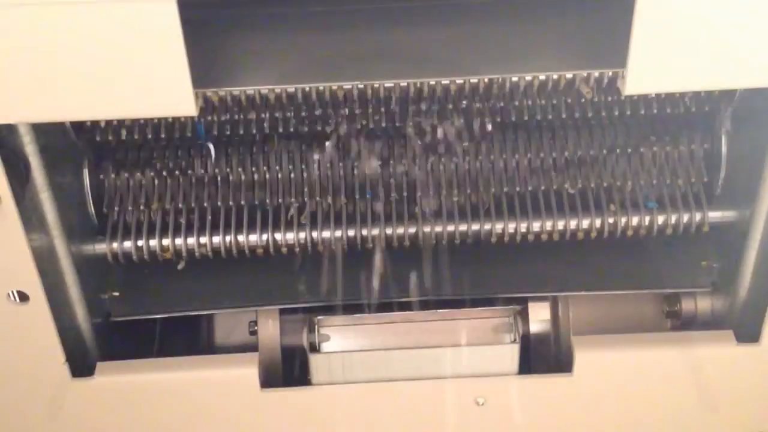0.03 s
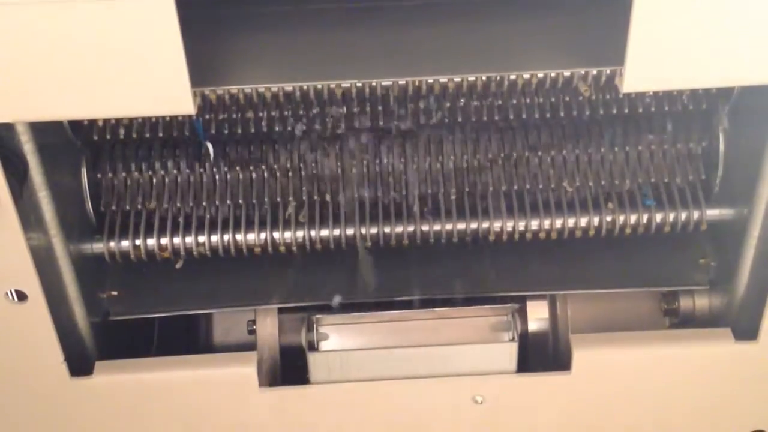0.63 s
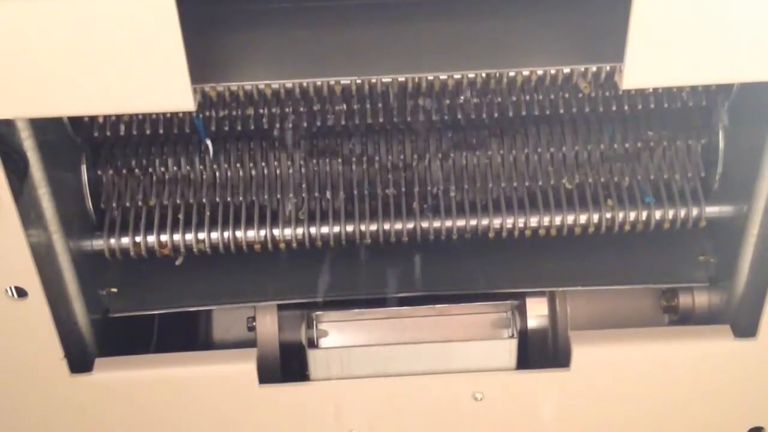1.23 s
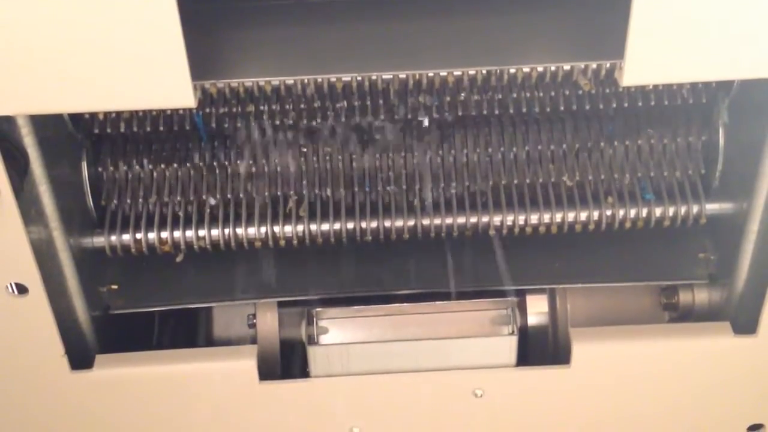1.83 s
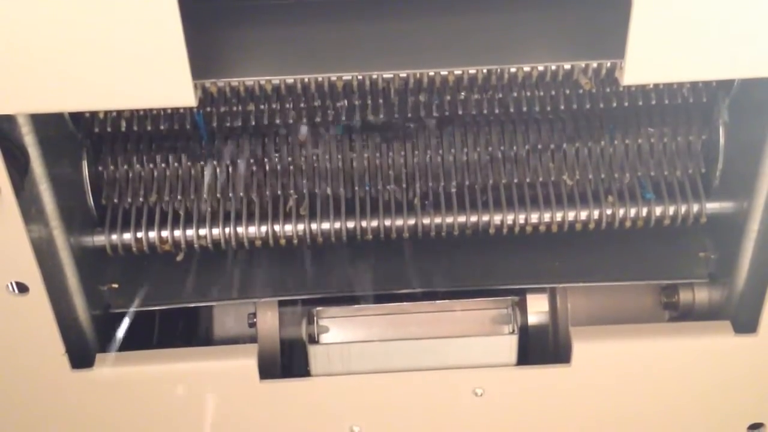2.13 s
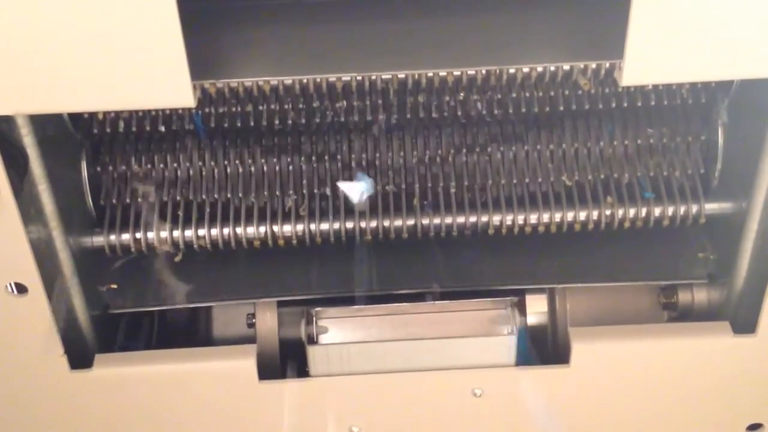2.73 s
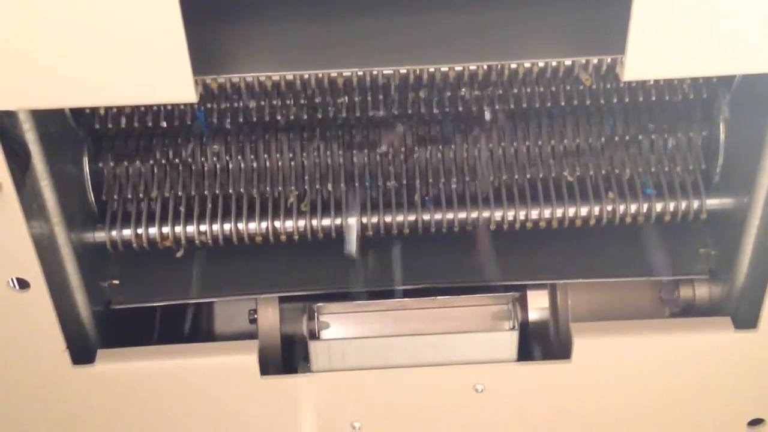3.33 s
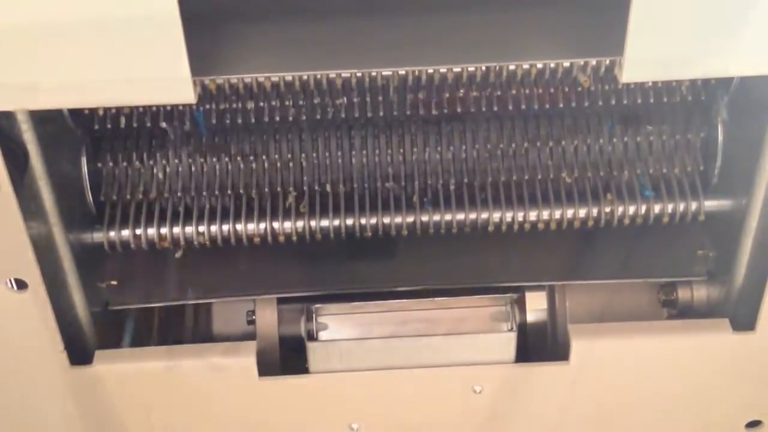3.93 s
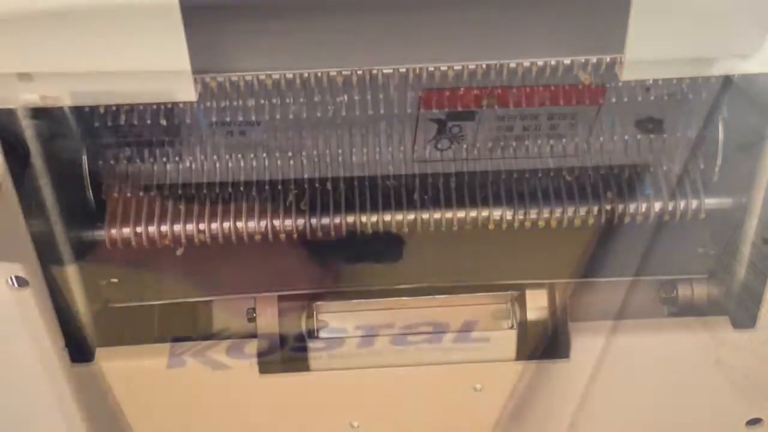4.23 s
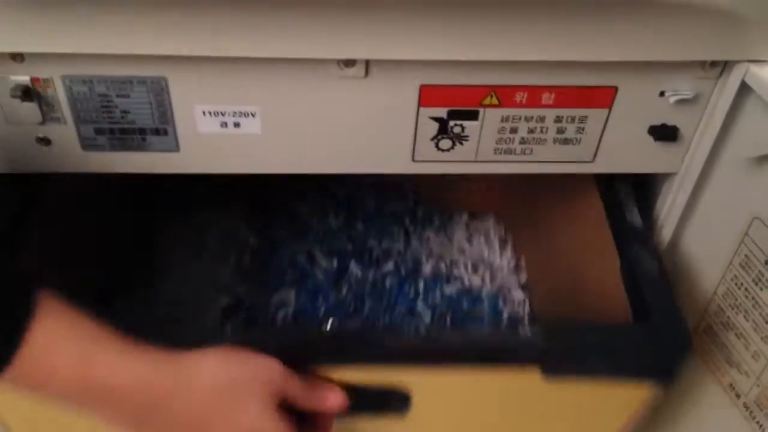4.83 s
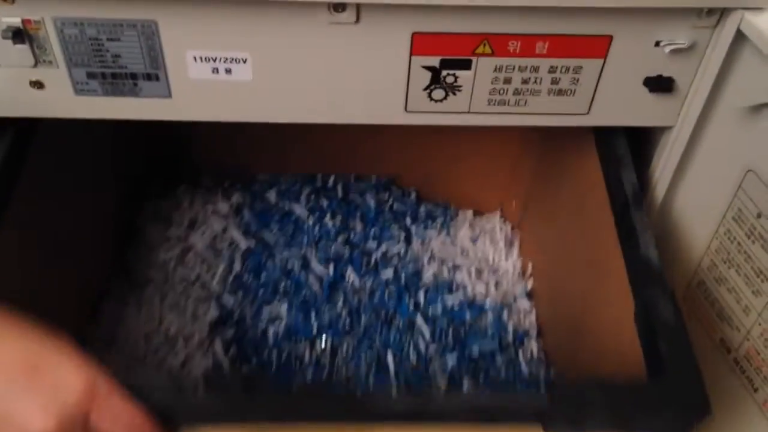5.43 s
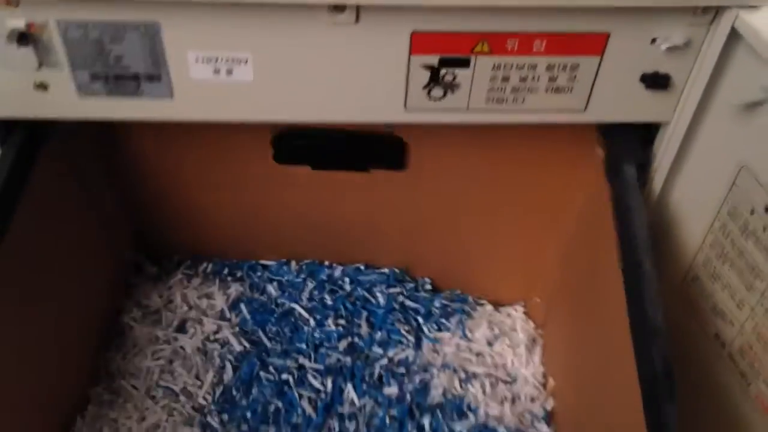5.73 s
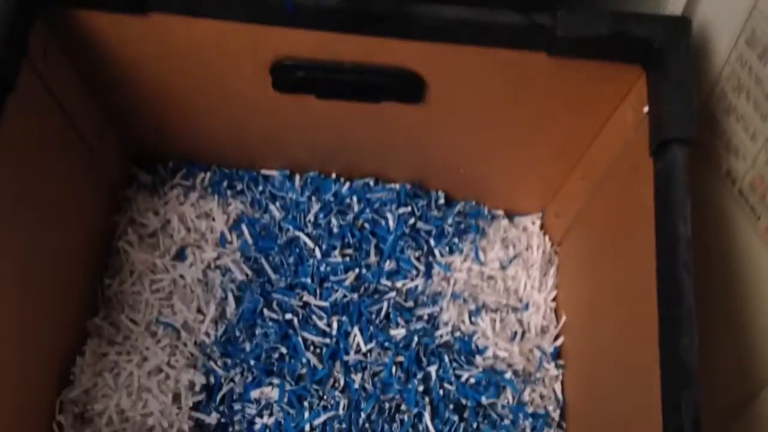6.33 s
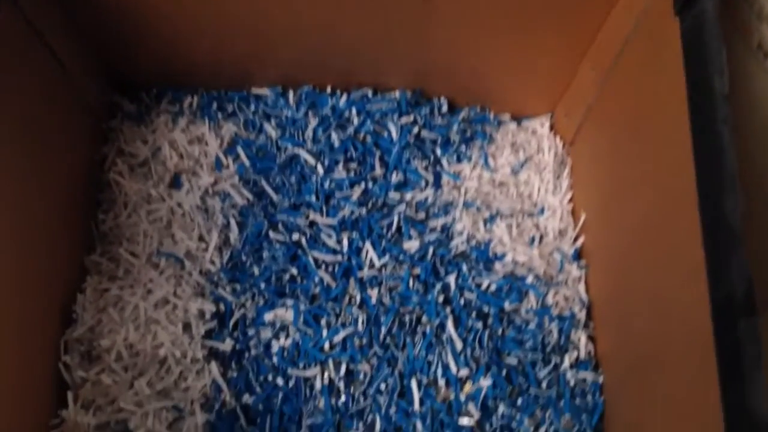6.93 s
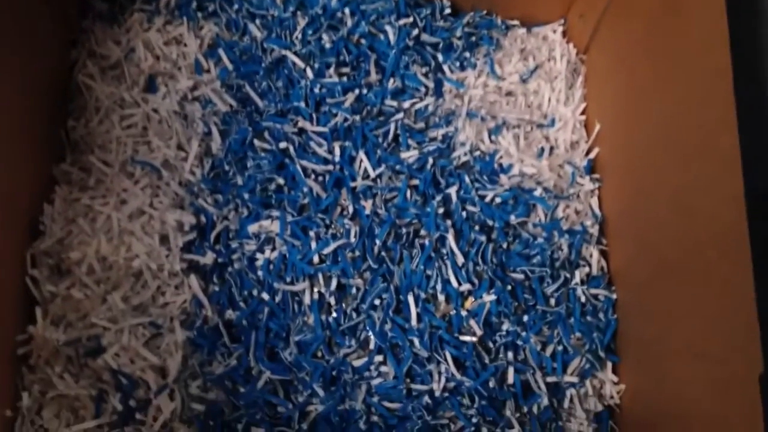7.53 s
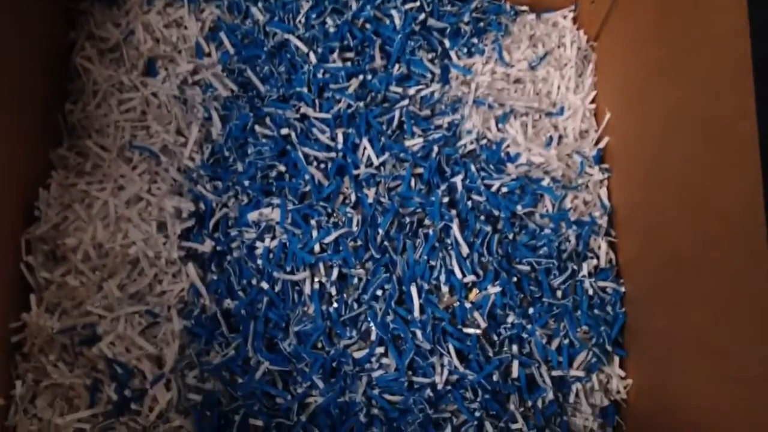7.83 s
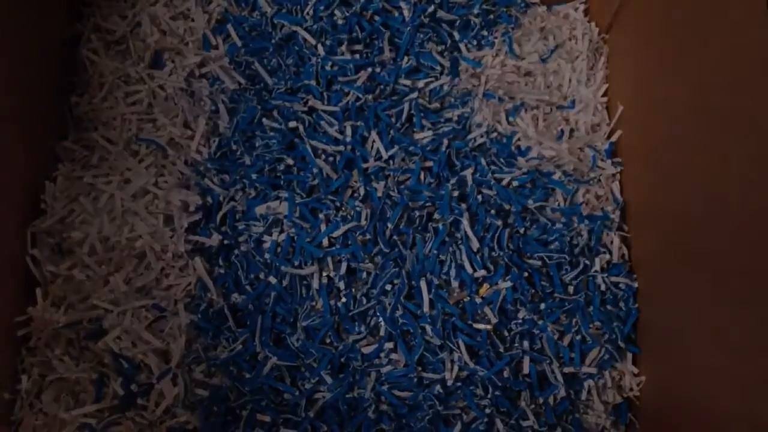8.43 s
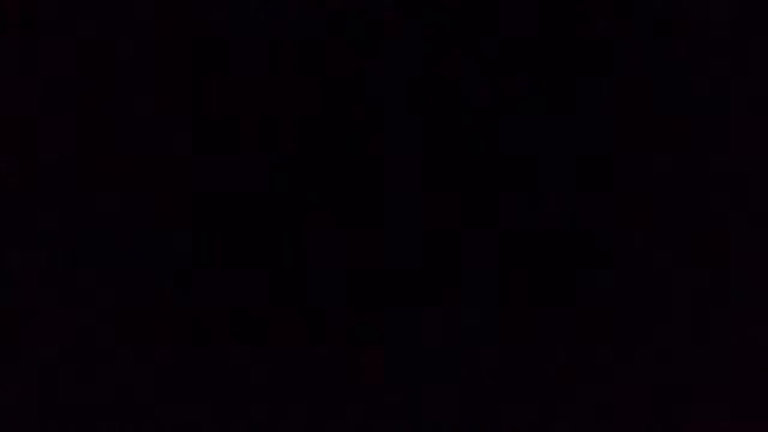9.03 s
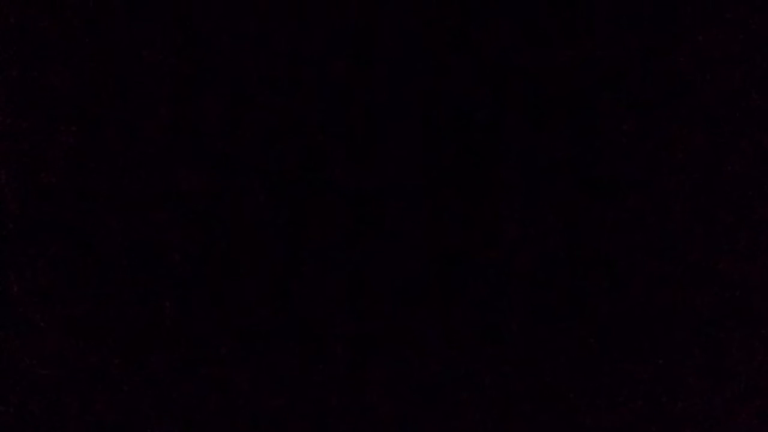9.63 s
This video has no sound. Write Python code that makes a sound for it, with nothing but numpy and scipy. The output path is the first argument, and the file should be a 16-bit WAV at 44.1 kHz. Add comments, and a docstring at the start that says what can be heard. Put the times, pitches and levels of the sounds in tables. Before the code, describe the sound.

Dense crunching and sharp snaps of tearing paper ring through the steel cutters of a big shredder, close to the microphone, while its motor hums and its gears faintly whine. The crackle grows sparse and the machine runs on more softly, then shuts off. A cardboard waste bin thumps loose and slides out in several short scrapes, followed by faint rubbing and the fading air of a quiet room.

```python
"""A large paper shredder, heard close up, chews the last scraps out of its steel cutters. Tearing paper
snaps and crunches and makes the steel ring, over the rumble of the motor and the whine of the gears; the
bites thin out as the cutters run empty. The motor stops, the cardboard bin is pulled free with a thump
and scrapes out along its runners. The quiet room fades away."""
import sys
import numpy as np
from scipy import signal
from scipy.fft import rfft, irfft
from scipy.io import wavfile
from scipy.ndimage import uniform_filter1d

SR = 44100
rng = np.random.default_rng(int(sys.argv[2]) if len(sys.argv) > 2 else 0)


def master(y):
    """Save y as 16-bit WAV."""
    cut = np.clip(np.atleast_2d(y).T, -1, 1)
    pcm = np.round(cut * 32767)  # scale
    wavfile.write(sys.argv[1], SR, pcm.astype(np.int16))


N = 426888
TIME = np.arange(N) / SR
GRID_HZ = np.maximum(np.fft.rfftfreq(2 ** 14, 1 / SR), 1)
EMPTY_S, FREE_S, STOP_S = 2.3, 3.8, 4.6   # cutters run empty, gears run free, motor stops

# Tilt is + for thin crisp paper, - for a thick wad. A t60 is the time a sound takes to fall by 60 dB.
# Scraps snapping in the cutters: t/s, force/dB, tilt/dB, base t60/s, clink f/Hz
SNAPS = [(0.051, -14.5, 1.5, 0.088, 2520), (0.107, -22.5, 6, 0.17, 2160), (0.1845, -31.5, 13.5, .07, 7920),
         (0.221, -24, 3.5, 0.24, 2230), (0.275, -16, -4, 0.13, 2592), (0.775, -12.5, -1.5, 0.092, 6487),
         (0.964, -17.5, -1.5, 0.27, 2240), (1.078, -10.5, -2, 0.1, 5677), (1.1414, -12, 2.5, 0.094, 4060),
         (1.218, -17.5, 5.5, 0.082, 4480), (1.272, -10.5, -2, 0.11, 2657), (1.321, -15, -10, .07, 3276),
         (1.373, -10, -5.5, .067, 2155), (1.419, -10.5, -0.5, 0.068, 2620), (1.451, -18, -1.5, .11, 4280),
         (1.5181, -10.5, -3.5, .086, 2140), (1.583, -21, -0.5, 0.11, 3074), (1.644, -13.5, 1, 0.093, 3676),
         (1.869, -13.5, -2.5, .11, 4034), (1.908, -20.5, 5.5, 0.051, 6660), (2.005, -25, 0, 0.04, 4980),
         (2.175, -16.5, 1.5, .11, 4620), (2.285, -15.5, 3, 0.11, 3520), (2.574, -36, 7, .14, 5070),
         (2.846, -32.5, 0, 0.067, 3550), (2.856, -32.5, 3.5, 0.045, 5600), (2.88, -16.5, 4.5, 0.11, 5720),
         (2.999, -25.5, -10.5, 0.055, 2750), (3.271, -32.5, 4, 0.063, 7920), (3.322, -27, 1, 0.14, 3870),
         (3.75, -34.5, 0.5, 0.3, 3290), (3.977, -40, -4, 0.066, 4180)]
# Wads dragged through, swelling to a peak: peak t/s, force/dB, tilt/dB, base t60/s, clink f/Hz
CRUNCHES = [(0.032, -15.5, -1.5, 0.074, 5730), (0.075, -21.5, 0, 0.1, 2610), (0.29, -15, -2.5, 0.069, 2570),
            (0.359, -19, 0.5, 0.12, 2570), (0.402, -19, 4.5, 0.16, 4050), (0.421, -14, -4, 0.14, 6340),
            (0.606, -33.5, -16.5, 0.1, 2300), (0.621, -27, -7.5, 0.14, 4112),
            (0.648, -26.5, -6, 0.057, 2130), (0.757, -24.5, -1.5, 0.11, 6690),
            (0.795, -21, -3.5, 0.075, 3985), (0.83, -20.5, -7.5, .19, 2930), (1.029, -19.5, -3, 0.14, 3100),
            (1.061, -13, -3, 0.077, 5740), (1.25, -22, -7.5, 0.065, 2470), (1.35, -26, 2, .08, 3157),
            (1.974, -13, -4.5, 0.027, 3110), (1.992, -22.5, -8.5, 0.022, 1750),
            (2.232, -28, -5.5, .09, 2656), (2.6, -32, 1.5, 0.29, 3595), (2.64, -32.5, -1.5, 0.14, 1900),
            (2.735, -37, 2, 0.22, 8770), (2.803, -42.5, 5.5, 0.13, 7000), (2.935, -32.5, -4.5, .2, 3700),
            (3.139, -42.5, 0.5, .15, 6500), (3.508, -46, 7, 0.17, 6660), (3.783, -26, -6, 0.058, 2940)]
# Chaff (loose bits of paper) tumbling round the cutters: t/s, level/dB
CHAFF = [(0, -21.5), (0.16, -31.5), (0.25, -24.5), (0.44, -29.5), (0.55, -37.5), (0.73, -37), (0.86, -30),
         (1.0, -31.5), (1.18, -32), (1.32, -27), (1.56, -41), (1.8, -34), (2.1, -34.5), (2.45, -36.5),
         (2.68, -46.5), (2.96, -41.5), (3.2, -52), (3.7, -55), (4.6, -64)]
# Light scraps flicked against a cutter disc: t/s, force/dB, clink f/Hz
TICKS = [(2.53, -33, 2450), (2.98, -25.5, 2850), (3.208, -37.5, 2010), (3.242, -31.5, 3700),
         (3.467, -41.5, 2160), (4.097, -40.5, 3230), (4.14, -37, 3080), (4.192, -32.5, 2680),
         (4.308, -52, 1900), (4.373, -51.5, 1840), (4.464, -56, 3230)]
TICK_T60_S = 0.083


def from_db(db):
    """Turn decibels into a factor to multiply by."""
    return np.exp(np.asarray(db) * (np.log(10) / 20))


def rms_one(x):
    """Scale a signal to an average power of 1."""
    return x / np.sqrt(np.mean(x ** 2) + 1e-20)


def in_time(rows):
    """Join points (t/s, value) with straight lines, giving a value at every sample."""
    return np.interp(TIME, *np.transpose(rows))


def after(s, width_s):
    """A smooth step from 0 to 1 around time s."""
    return .5 + .5 * np.tanh((TIME - s) / width_s)


def stroke(start, end, attack_s, release_s):
    """A movement that gathers speed, holds and comes to rest."""
    return after(start, attack_s) * (1 - after(end, release_s))


def drift(rate):
    """A random wobble of typical size 1 that heads for a new value `rate` times a second."""
    points = rng.standard_normal(2 ** 13)
    return rms_one(np.interp(TIME * rate, np.arange(len(points)), points))


def grains(spread_db, clump_db, clump_rate, per_s):
    """Tiny cracks of uneven size that come at random, in louder and softer clumps."""
    sizes = from_db(spread_db * np.clip(rng.standard_normal(N), -2, 2) + clump_db * drift(clump_rate))
    return rms_one(rng.choice([-1, 1], N) * sizes * (rng.random(N) < per_s / SR))


def response(tone, modes=()):
    """How well a body passes each frequency: a broad tone (f/Hz, gain/dB) with peaks where it rings."""
    hz, db = np.transpose(tone)
    gain = from_db(np.interp(np.log(GRID_HZ), np.log(hz), db))
    for centre, width, lift_db in modes:
        gain = gain * from_db(lift_db / (1 + (2 * (GRID_HZ - centre) / width) ** 2))
    return gain


def resonate(force, gain):
    """Shake a body with that response: it rings after each push, never before (minimum phase)."""
    cepstrum = irfft(np.log(gain / gain.max() + 1e-5))
    half = len(cepstrum) // 2
    one_sided = 2 * cepstrum * (np.arange(2 * half) < half)
    ring = irfft(np.exp(rfft(one_sided)))[:half]
    return signal.oaconvolve(force, ring / np.linalg.norm(ring))[:N]


def zones(gain, edges_hz):
    """Split a response into its low, middle and high zones."""
    return [gain / np.sqrt((1 + (low / GRID_HZ) ** 8) * (1 + (GRID_HZ / high) ** 8))
            for low, high in zip(edges_hz, edges_hz[1:])]


def in_zone(events, gain_db, tilt_share):
    """Blows as one zone of a body feels them: t/s, level/dB, t60/s."""
    return [(s, db + gain_db + tilt_share * tilt_db, t60) for s, db, tilt_db, t60, hz in events]


def swell(s, rise_s, t60):
    """The samples that a blow covers, and its shape: up to a peak at time s, then dying away."""
    span = slice(max(int((s - .1) * SR), 0), int((s + .5) * SR))
    age = TIME[span] - s
    return span, np.exp(-np.where(age < 0, -age / rise_s, np.log(1000) * age / max(t60, .01)))


def blow_power(blows, rise_s, linger):
    """Add up the power of blows (t/s, level/dB, t60/s); `linger` stretches each t60."""
    power = np.zeros(N)
    for s, db, t60 in blows:
        span, shape = swell(s, rise_s, t60 * linger)
        power[span] += (from_db(db) * shape) ** 2
    return power


def rings(blows, rise_s, linger, width_hz):
    """Each blow (t/s, level/dB, t60/s, f/Hz) rings one note, roughened by the chattering contact."""
    phase = np.cumsum(rng.standard_normal(N)) * np.sqrt(2 * np.pi * width_hz / SR)
    phase = uniform_filter1d(phase, size=40)
    out = np.zeros(N)
    for s, db, t60, hz in blows:
        span, shape = swell(s, rise_s, t60 * linger)
        out[span] += np.sqrt(2) * from_db(db) * shape * np.sin(2 * np.pi * hz * TIME[span] + phase[span])
    return out


def clinks(events, gain_db=-5.5, centre_hz=3400):
    """List each blow's clink for rings(): crisp blows favour high notes, dull blows low ones."""
    return [(s, db + gain_db + .6 * tilt_db * np.log2(hz / centre_hz), t60, hz)
            for s, db, tilt_db, t60, hz in events]


def thuds(blows, hz, spread_db):
    """List one low note for rings(), struck a little harder or softer by each blow."""
    chance = rng.uniform(-1, 1, len(blows))
    return [(s, db + spread_db * luck, t60, hz) for (s, db, t60), luck in zip(blows, chance)]


def pings(level_db, per_s, low_hz, high_hz, spread_db, t60):
    """Small taps at random times, each ringing briefly at a pitch of its own."""
    chance = rng.random((2000, 3))
    times = np.cumsum(-np.log(1 - chance[:, 0]) / per_s)
    out = np.zeros(N + SR)
    age = TIME[:SR // 12]
    decay = from_db(-60 * age / t60)
    for s, (_, pitch, size) in zip(times[times < TIME[-1]], chance):
        start = int(s * SR)
        strength = from_db(level_db[start] + spread_db * (size - 1))
        hz = low_hz * (high_hz / low_hz) ** pitch
        out[start:start + len(age)] += strength * decay * np.sin(2 * np.pi * hz * age)
    return out[:N]


def reverberate(x, wet_db, t60, split_hz):
    """Add a wash of echoes; the part above split_hz lasts a little longer."""
    age = TIME[:SR // 2]
    noise = rng.standard_normal(len(age))
    low = signal.sosfilt(signal.butter(1, split_hz, fs=SR, output="sos"), noise)
    tail = low * from_db(-60 * age / t60) + (noise - low) * from_db(-60 * age / (1.2 * t60))
    tail = tail * (age > .004)
    return x + from_db(wet_db) * signal.oaconvolve(x, tail / np.linalg.norm(tail))[:N]


def aftermath(gain_db, follows, rise_s, t60):
    """Power that builds after each bite and dies away; it gains `follows` dB per dB of force."""
    blows = [(s + 2 * rise_s, gain_db + follows * db, t60) for s, db, *_ in SNAPS + CRUNCHES]
    return blow_power(blows, rise_s, linger=0.93)


def cutters():
    """Tearing paper shakes the frame, rings the cutter discs and crackles by itself."""
    # Broad tone of the cutting: f/Hz, gain/dB
    cutting_tone = [(150, -43), (250, -8.5), (352, -10), (471, -14), (748, -3.5), (1050, -6.5),
                    (1150, -12.5), (1230, -7.5), (1860, -7.5), (2570, -5.5), (2800, -6.5), (3940, -10.5),
                    (9000, -14.5), (15000, -18.5)]
    # Where the steel rings: f/Hz, width/Hz, lift/dB
    steel_modes = [(351, 24, 12.5), (426.4, 9.9, 16), (512, 50, 4.5), (752, 160, 3.5), (840, 30, -1),
                   (1046, 28, 9.5), (1230, 55, 3), (1340, 50, 6), (1750, 70, 3), (1950, 76, 1.5),
                   (2245, 40, 7), (2510, 65, 4.5), (3115, 70, 7), (3290, 110, 4), (3560, 90, 5.5),
                   (3957, 300, 5.5), (4700, 220, 2), (5440, 130, 2.5), (6610, 100, 3.5)]
    # Edges of the frame, cutter and paper zones: f/Hz
    edges_hz = [450, 1500, 5000, 18000]
    # How each zone takes a blow: share of the tilt, snap/dB, crunch/dB, tick/dB, chaff/dB,
    # change as the paper thins/dB, t60 factor
    parts = {"chassis": (-0.6, -3, -4, -17.5, -1.4, -6, 1.6), "cutters": (0, -.1, -.5, .1, -0.73, -.3, 1.1),
             "paper": (1, 0.67, 0.5, -9, -5.5, 0.5, 1.0)}
    crack_db = [7, 10, 10]   # frame, cutters, paper
    thin = after(1.5, .3)   # the paper thins out and grips the frame less
    running = 1 - after(STOP_S, 0.061)
    spill = aftermath(gain_db=-21, follows=0.91, rise_s=.015, t60=.45)   # each bite sheds more chaff
    chaff = running * np.sqrt(from_db(in_time(CHAFF)) ** 2 + spill)
    bodies = zones(response(cutting_tone, steel_modes), edges_hz)
    out, activity_db = struck_steel(thin), []
    for k, part in enumerate(parts.values()):
        tilt_share, snap_db, crunch_db, tick_db, chaff_db, thin_db, linger = part
        breaks = in_zone(SNAPS, snap_db, tilt_share)
        breaks += [(s, db + tick_db, TICK_T60_S) for s, db, hz in TICKS]
        snaps = blow_power(breaks, rise_s=0.00073, linger=linger)
        crunches = blow_power(in_zone(CRUNCHES, crunch_db, tilt_share), rise_s=0.0064, linger=linger)
        loose = chaff * from_db(chaff_db)
        crackle = grains(spread_db=4.0, clump_db=1.84, clump_rate=600, per_s=9000)
        tearing = np.sqrt(snaps + crunches) * crackle
        tumbling = loose * grains(spread_db=2.5, clump_db=4.0, clump_rate=170, per_s=6500)
        cracks = from_db(crack_db[k]) * first_cracks(breaks)
        out += resonate(from_db(thin * thin_db) * (cracks + tearing + tumbling), bodies[k])
        power = loose ** 2 + crunches + from_db(-3.5) * snaps
        activity_db.append(thin * thin_db + 10 * np.log10(power + 1e-12))
    # loose scraps tick against the steel
    out += pings(activity_db[0], per_s=80, low_hz=621, high_hz=1442, spread_db=5.5, t60=0.13)
    out += pings(activity_db[1], per_s=190, low_hz=1462, high_hz=5035, spread_db=2.5, t60=0.075)
    out += pings(activity_db[2] - 1.5, per_s=210, low_hz=4420, high_hz=14930, spread_db=11.5, t60=0.044)
    return reverberate(out, wet_db=-14.5, t60=0.22, split_hz=4000)


def drive():
    """The motor hums, the gears whine and the cabinet rumbles, on other notes once the cutters empty."""
    # Broad tone of the rumble: f/Hz, gain/dB
    rumble_tone = [(15, -47.5), (25, -17), (81, -7), (124, 1.5), (211, 0), (286, -13.5), (352, -13),
                   (400, -17.5), (520, -41.5), (880, -120)]
    # Where the cabinet rings while cutting, and when empty: f/Hz, width/Hz, lift/dB
    loaded_modes = [(128, 14, 2.9), (154, 7.1, 6), (210.7, 15, 9), (357, 10, 12), (444, 13, 23)]
    idle_modes = [(45, 38, 6), (80, 30, 2.9), (127, 13, 12), (156, 14, 9.7), (227, 15.6, 5)]
    # Notes of the gears: f/Hz, level while chaff drags/dB, level running free/dB
    gear_notes = [(538, -58, -59), (641, -63, -66.5), (897, -55.5, -70), (953, -59, -67),
                  (1005, -53.5, -71.5), (1130, -62.5, -68), (1345, -68, -71), (1615, -73, -70),
                  (1650, -61.5, -61.5), (1885, -69, -61.5), (1968, -60, -71), (2040, -62, -71)]
    empty, free = after(EMPTY_S, 0.07), after(FREE_S, 0.5)
    loaded = np.sqrt(1 - empty) * resonate(rng.standard_normal(N), response(rumble_tone, loaded_modes))
    idle = np.sqrt(empty) * resonate(rng.standard_normal(N), response(rumble_tone, idle_modes))
    hum_hz = 124.5 * (1 + 0.03 * drift(14))
    hum = from_db(-5.5 + 1.3 * drift(16)) * np.sin(2 * np.pi * np.cumsum(hum_hz) / SR)
    rumble = drive_load(empty) * (from_db(-0.5) * loaded + from_db(-3.5) * idle + hum)
    speed = 1 + 0.00085 * drift(9.8)
    gear_time = np.cumsum(speed) / SR
    whine = 0
    for hz, dragging_db, free_db in gear_notes:
        level_db = dragging_db + free * (free_db - dragging_db) + 3 * drift(25)
        slack = 0.59 * drift(55)   # play between the teeth roughens each note
        whine += np.sqrt(2) * from_db(level_db) * np.sin(2 * np.pi * hz * gear_time + slack)
    return (rumble + from_db(-1) * whine) * (1 - after(STOP_S, 0.024))


def drive_load(empty):
    """Strength of the rumble: chaff and fresh bites strain the drive until the cutters are empty."""
    # Rumble with the cutters empty: t/s, level/dB
    idle_levels = [(2.4, -36.5), (2.7, -39.5), (3.04, -36), (3.26, -43.5), (3.7, -42.5), (3.9, -37),
                   (4.34, -39.5), (4.58, -49)]
    eased_db = -8 * after(1.6, .15)   # the main wad is through
    steady = from_db(-14 + 0.46 * in_time(CHAFF) + eased_db)
    strain = aftermath(gain_db=-28.5, follows=0.085, rise_s=0.0037, t60=0.37)
    idle = from_db(in_time(idle_levels))
    return np.sqrt((1 - empty) * (steady ** 2 + strain) + empty * idle ** 2)


def struck_steel(thin):
    """Where a scrap is bitten decides which disc clinks; the panels ring under every bite."""
    # Notes of the panels: f/Hz, gain when packed/dB, gain when nearly empty/dB, width/Hz
    panel_notes = [(761.5, -7, -21, 50), (1053, -13, -13, 30), (1235, -14.5, -26, 43)]
    ticks = [(s, db - 4.0, TICK_T60_S, hz) for s, db, hz in TICKS]
    out = from_db(2.5) * rings(clinks(SNAPS), rise_s=.0003, linger=0.91, width_hz=90)
    out += from_db(-0.5) * rings(clinks(CRUNCHES), rise_s=0.0045, linger=1.0, width_hz=130)
    out += rings(ticks, rise_s=.0003, linger=1.1, width_hz=70)
    out += hollow_knocks()
    for hz, packed_db, empty_db, width_hz in panel_notes:
        snap_blows = thuds(in_zone(SNAPS, gain_db=-2, tilt_share=-.7), hz, spread_db=5.5)
        snaps = rings(snap_blows, rise_s=.001, linger=1.4, width_hz=width_hz)
        crunch_blows = thuds(in_zone(CRUNCHES, gain_db=-.5, tilt_share=-.7), hz, spread_db=4.5)
        crunches = rings(crunch_blows, rise_s=.006, linger=.92, width_hz=width_hz)
        out += from_db(packed_db + thin * (empty_db - packed_db)) * (snaps + crunches)
    return out


def hollow_knocks(hz=518.6, t60=0.11, full_db=-24, full_force_db=-10):
    """Hard bites make the whole housing knock; the knock grows faster than the force, up to a limit."""
    blows = [(s, min(full_db + 2.2 * (db - full_force_db), full_db), t60, hz)
             for s, db, _ in in_zone(SNAPS + CRUNCHES, gain_db=0, tilt_share=-.4)]
    return rings(blows, rise_s=.002, linger=0.99, width_hz=85)


def first_cracks(blows):
    """Each snap opens with one clean break: a push one sample long."""
    force = np.zeros(N)
    for s, db, _ in blows:
        force[int(s * SR)] = from_db(db)
    return force


def chip():
    """One flying chip strikes very close by and bounces: a dry, sharp tick."""
    force = np.zeros(N)
    for s, strength in [(3.1885, -3), (3.1899, -4.5)]:
        force[int(s * SR)] = strength
    tone = [(300, -17), (2000, -18.5), (3500, -2), (6000, 1.5), (9000, -5), (15000, -9.5)]
    return resonate(force, response(tone))


def waste_bin():
    """The cardboard box booms as it is jerked free, then scrapes out along its runners."""
    # The bin knocking on its frame: t/s, force/dB, tilt/dB, base t60/s, clink f/Hz
    knocks = [(4.738, -25.5, 0, 0.25, 1700), (4.808, -39, -19, 0.052, 1870), (4.85, -42.5, -3, 0.23, 3090),
              (5.146, -43, -3.5, 0.074, 2940), (5.235, -59, -12, .15, 3070),
              (5.315, -53.5, -12, 0.091, 4740), (5.75, -49.5, -1, 0.17, 2060),
              (6.16, -54.5, -12.5, 0.071, 1500), (6.294, -53.5, 6.5, 0.19, 2030),
              (6.474, -60, 5.5, 0.091, 1970)]
    # Pulls that drag it out: start/s, end/s, box level/dB, panel level/dB, scrape level/dB
    pulls = [(4.633, 4.724, -34.5, -42, -41.5), (4.763, 4.971, -42, -36, -46.5),
             (4.98, 5.342, -45, -63.5, -66.5), (5.429, 5.54, -45, -48, -49.5),
             (5.561, 5.631, -51, -49, -41.5), (5.68, 5.823, -52, -46.5, -48.5),
             (5.88, 6.196, -53, -70, -68)]
    # Broad tone of cardboard: f/Hz, gain/dB
    cardboard_tone = [(18, -50), (30, -11), (122, 3.5), (267, -1.5), (312, -7), (374, -8), (426, -8),
                      (662, -11), (928, -10.5), (1300, -20.5), (1870, -20), (2130, -21.5), (15000, -46.5)]
    # Where the box rings in place, on its runners and when rubbed: f/Hz, width/Hz, lift/dB
    box_modes = [(122.7, 28, 4.3), (165, 29, 4.73), (317.7, 10.5, 15.3), (425, 22, 4.6), (520, 92, 3.9),
                 (724, 30, 5), (1000, 72, 1.8), (1770, 140, 3), (2710, 17, 2.6)]
    runner_modes = [(208, 24, 11), (720, 44, 12), (940, 48, 3.6), (1226, 72, 7), (1520, 56, 8),
                    (1680, 57, 7.7), (2030, 67, 6.4), (2280, 50, 3.7), (3120, 53, 4.2)]
    rub_modes = [(1550, 80, 5), (2050, 90, 4), (2450, 140, 8.7), (3700, 300, 4), (4400, 250, 5)]
    # Edges of the box, panel and frame zones: f/Hz
    edges_hz = [25, 300, 1200, 18000]
    # Notes the cardboard walls ring at every knock: f/Hz, gain/dB
    wall_notes = [(320, -10), (425, -9.5), (525, -10.5)]
    # Faint rubbing as the bin is eased further out: start/s, end/s, level/dB
    rubs = [(5.86, 6.05, -58.5), (6.15, 6.7, -68), (6.78, 7.08, -67)]
    knock_db, slide_db, linger = [1.0, -0.69, 3.9], [-1.1, -0.04, 0.36], [1.4, 1.3, .8]   # by zone
    on_runners = after(5.35, 0.07)
    boxes = zones(response(cardboard_tone, box_modes), edges_hz)
    runners = zones(response(cardboard_tone, runner_modes), edges_hz)
    out = 0
    for k in range(len(boxes)):
        blows = in_zone(knocks, knock_db[k], tilt_share=k - 1)
        knocking = np.sqrt(blow_power(blows, rise_s=0.00033, linger=linger[k]))
        sliding = sum(from_db(db[k] + slide_db[k]) * stroke(start, end, attack_s=0.042, release_s=0.049)
                      for start, end, *db in pulls)
        grit = grains(spread_db=0.5, clump_db=1.5, clump_rate=130, per_s=5300)
        out += resonate(np.hypot(knocking, sliding * (1 - on_runners)) * grit, boxes[k])
        out += resonate(sliding * on_runners * grit, runners[k])
    out += from_db(-1.5) * rings(clinks(knocks), rise_s=0.00057, linger=1.0, width_hz=96)
    for hz, ring_db in wall_notes:
        blows = thuds(in_zone(knocks, ring_db, tilt_share=-.35), hz, spread_db=3)
        out += rings(blows, rise_s=0.0011, linger=3.1, width_hz=27.4)
    # the edge of the box catches and slips in tiny ticks that follow the highest zone's sliding
    scrape_db = 20 * np.log10(sliding + 1e-9)
    out += pings(scrape_db + 2, per_s=150, low_hz=1198, high_hz=2994, spread_db=17, t60=0.055)
    rub = sum(from_db(db) * stroke(start, end, attack_s=0.055, release_s=0.123)
              for start, end, db in rubs)
    rub_body = response([(300, -39.5), (1200, -3), (2500, 1), (5000, -9), (15000, -29)], rub_modes)
    out += resonate(rub * grains(spread_db=3.5, clump_db=4.0, clump_rate=30, per_s=5200), rub_body)
    return reverberate(out, wet_db=-8.0, t60=0.63, split_hz=2500)


def room_air(air_db=-54, murmur_db=-62):
    """Steady room noise with a faint hiss on top; a low rumble swells once near the end."""
    # Broad tone of the room noise: f/Hz, gain/dB
    room_tone = [(15, -48), (25, -21.5), (59, -4.5), (103, -3.5), (181, -13.5), (231, -6.5), (335, -17),
                 (415, -17.5), (475, -13), (729, -19.5), (1000, -20.5), (1120, -24), (1580, -22),
                 (2930, -32), (15000, -36)]
    # Where the room rings: f/Hz, width/Hz, lift/dB
    room_modes = [(140, 29, 4.5), (190, 12, 4.5), (350, 14, 4.5), (478, 14, 1.5), (2030, 270, 2)]
    swelling = from_db(-57.5) * stroke(start=7.07, end=8.57, attack_s=.1, release_s=.25)
    murmur_tone = [(25, -17), (60, -3), (95, 0), (150, -11.5), (400, -44.5), (2000, -79)]
    murmur = resonate(rng.standard_normal(N), response(murmur_tone))
    air = resonate(rng.standard_normal(N), response(room_tone, room_modes))
    return from_db(air_db) * air + np.hypot(from_db(murmur_db), swelling) * murmur


def scene():
    """Shredder, bin and room together in one channel."""
    return (cutters() + chip() + drive() + waste_bin() + room_air())[None]


def record(dry, fade_start_s=8.06, fade_end_s=9.066, cutoff_hz=15600):
    """Round off the loudest peaks, fade out the end and cut the highest treble."""
    fade = np.clip((fade_end_s - TIME) / (fade_end_s - fade_start_s), 0, 1)
    rounded = 1.288 * np.tanh(dry / 1.3)
    return signal.sosfilt(signal.ellip(12, .1, 80, cutoff_hz, fs=SR, output="sos"), rounded * fade)


dry = scene()
out = record(dry)
master(out)
```